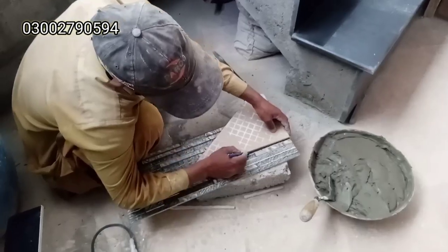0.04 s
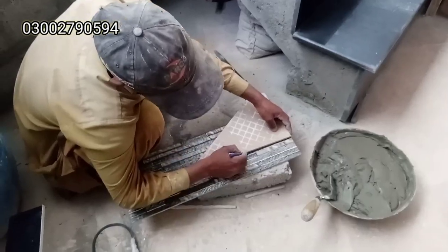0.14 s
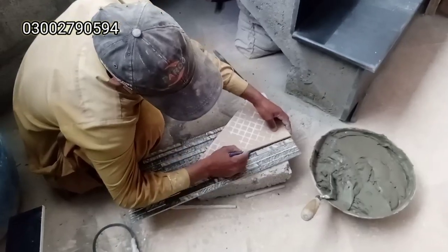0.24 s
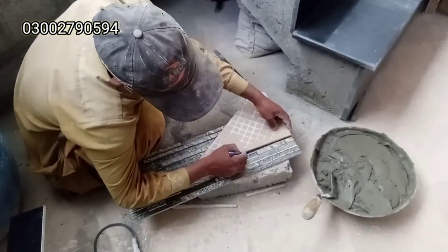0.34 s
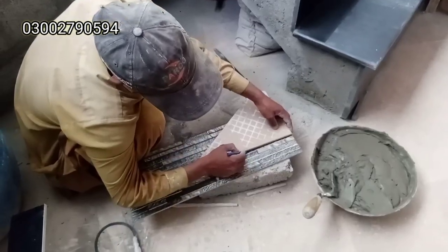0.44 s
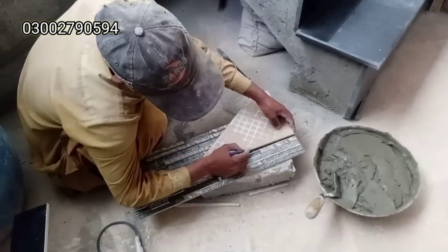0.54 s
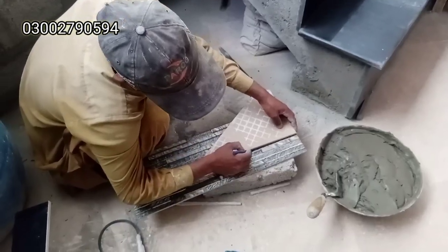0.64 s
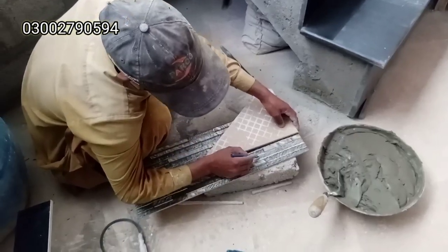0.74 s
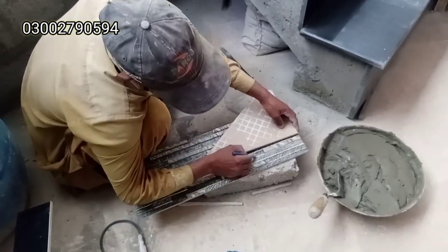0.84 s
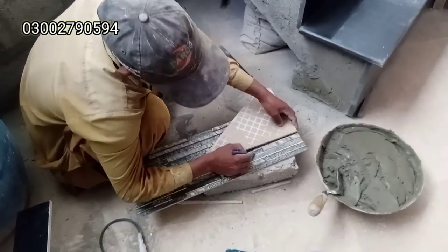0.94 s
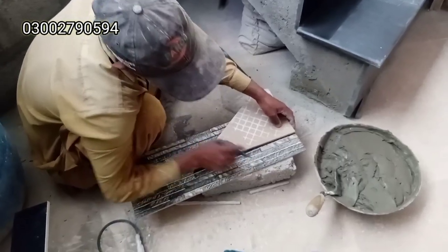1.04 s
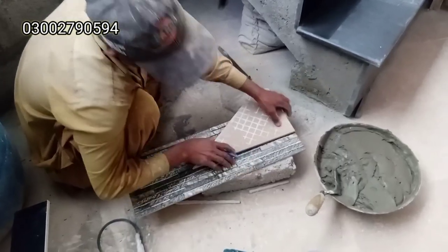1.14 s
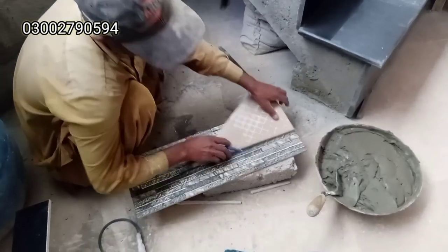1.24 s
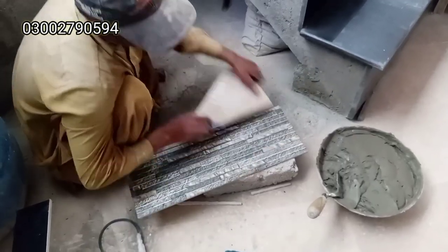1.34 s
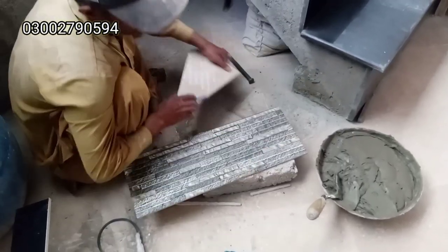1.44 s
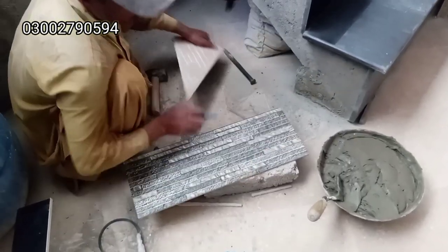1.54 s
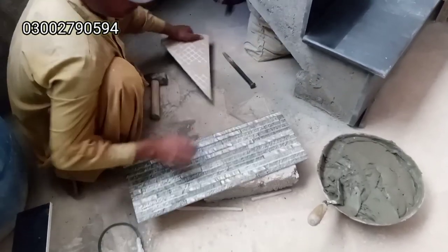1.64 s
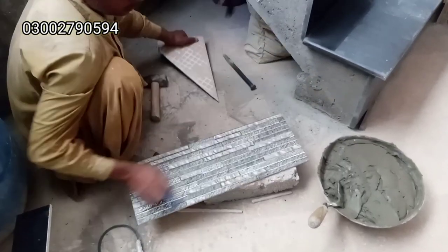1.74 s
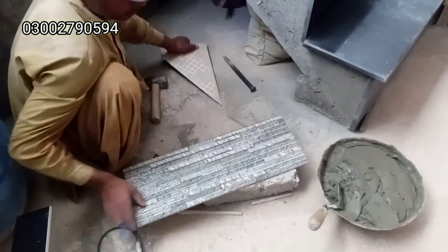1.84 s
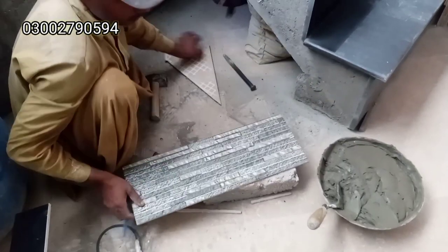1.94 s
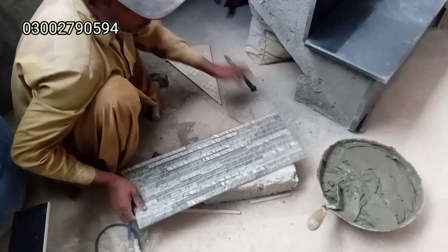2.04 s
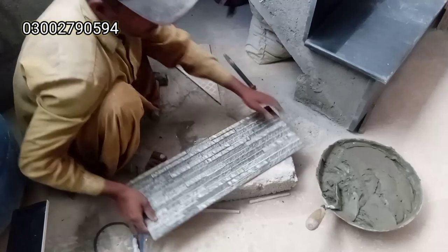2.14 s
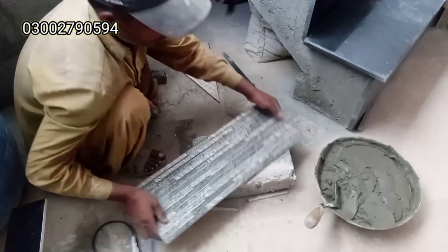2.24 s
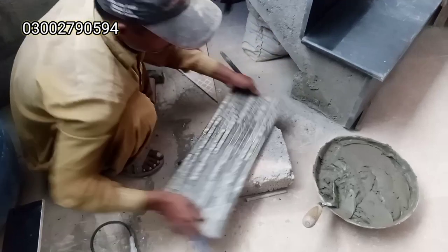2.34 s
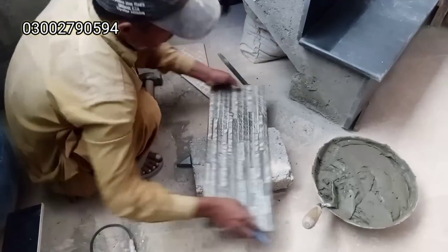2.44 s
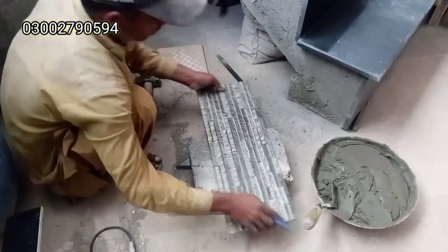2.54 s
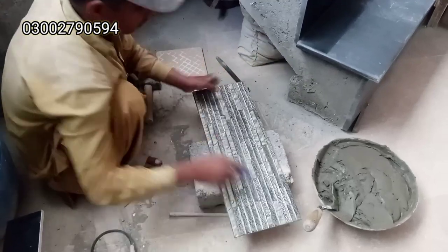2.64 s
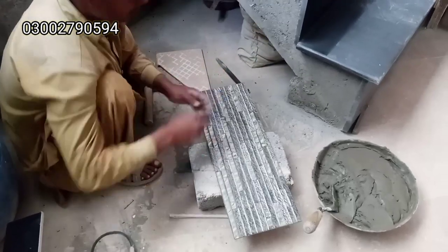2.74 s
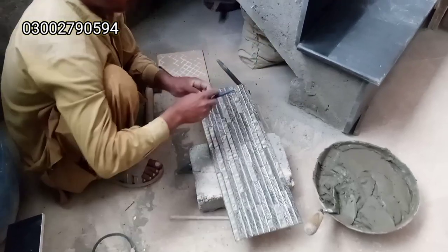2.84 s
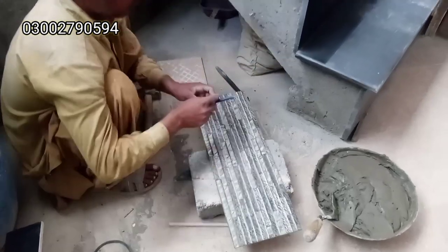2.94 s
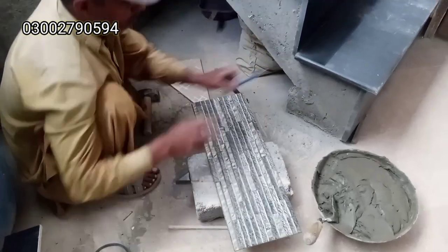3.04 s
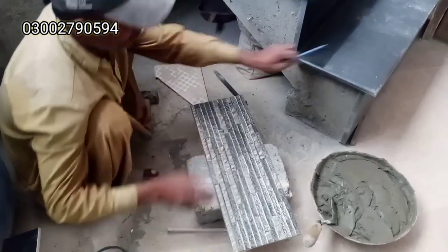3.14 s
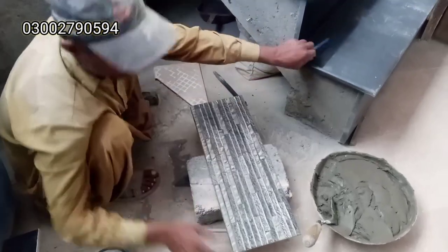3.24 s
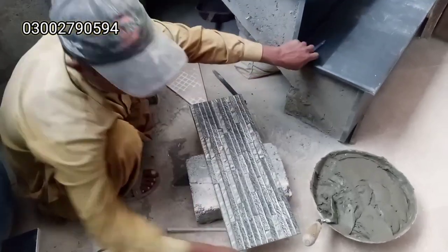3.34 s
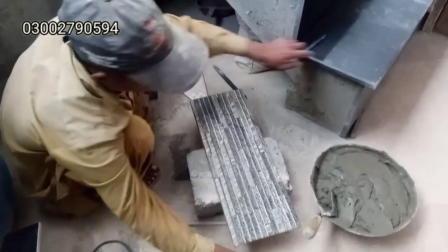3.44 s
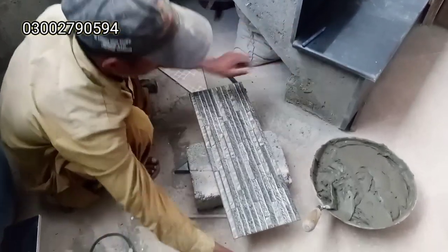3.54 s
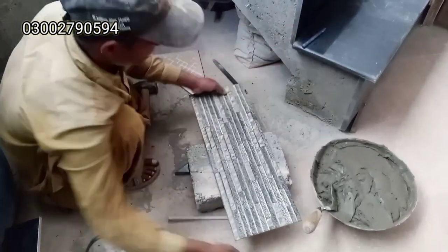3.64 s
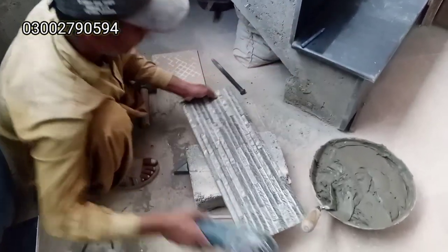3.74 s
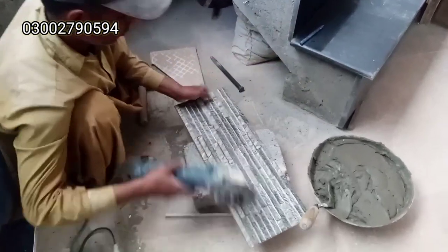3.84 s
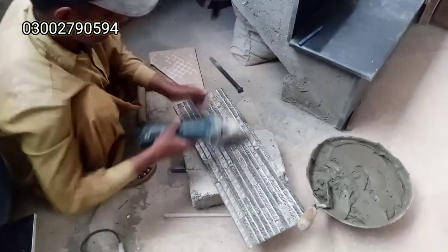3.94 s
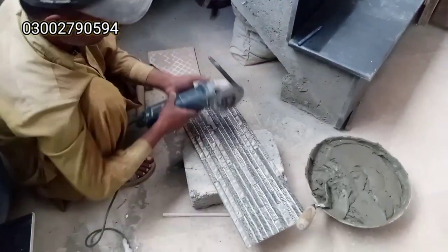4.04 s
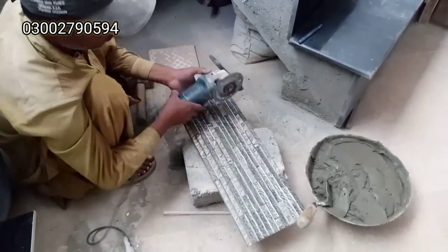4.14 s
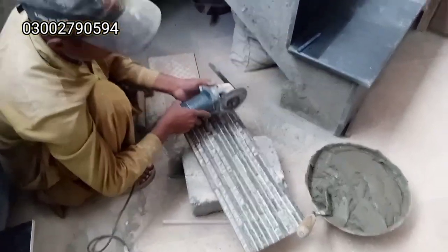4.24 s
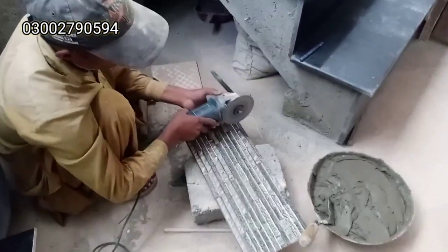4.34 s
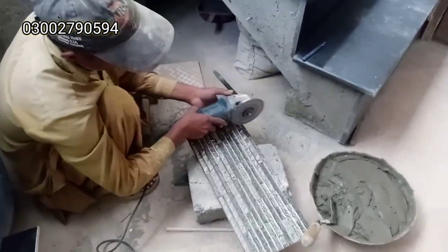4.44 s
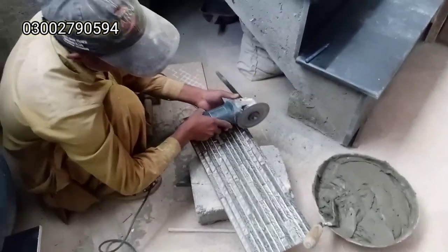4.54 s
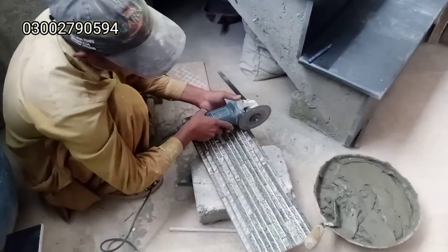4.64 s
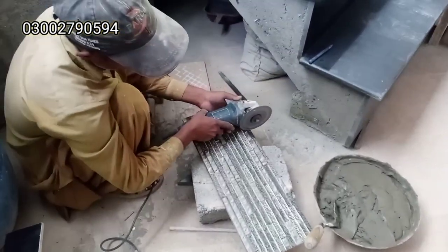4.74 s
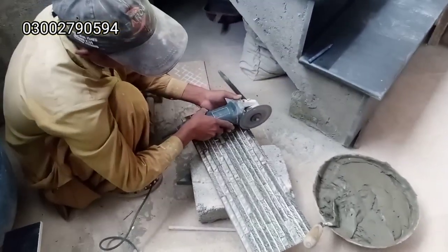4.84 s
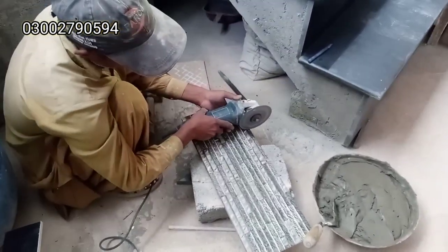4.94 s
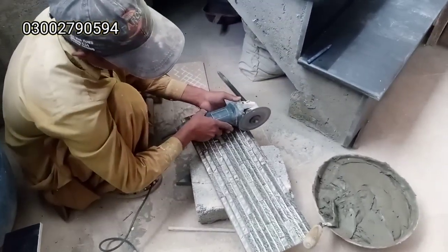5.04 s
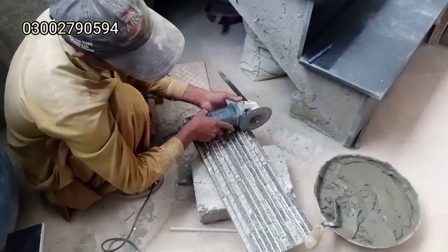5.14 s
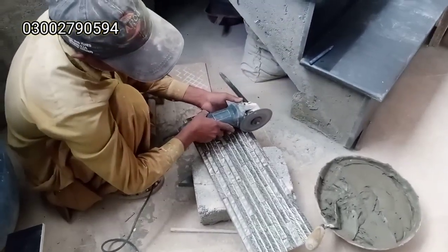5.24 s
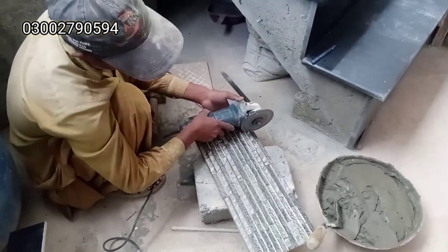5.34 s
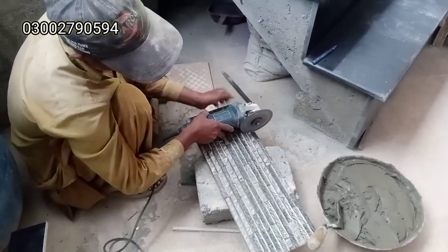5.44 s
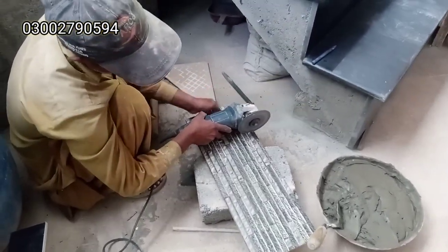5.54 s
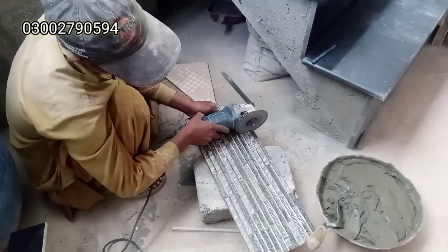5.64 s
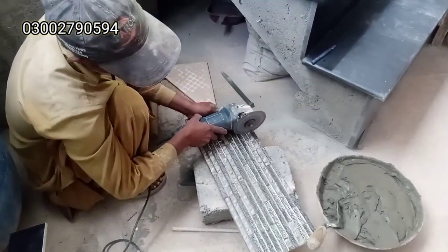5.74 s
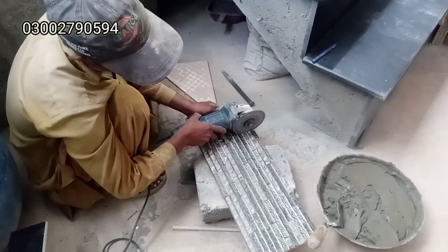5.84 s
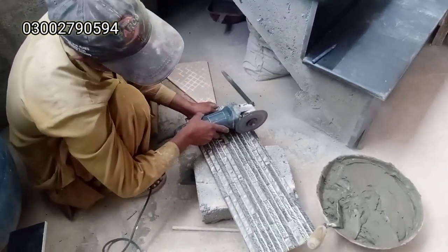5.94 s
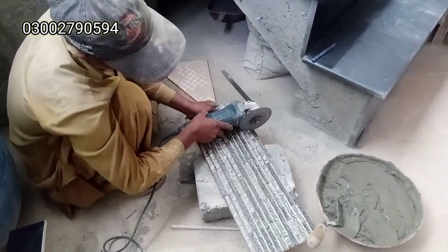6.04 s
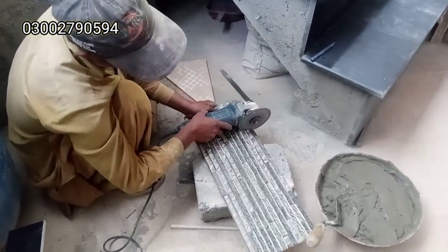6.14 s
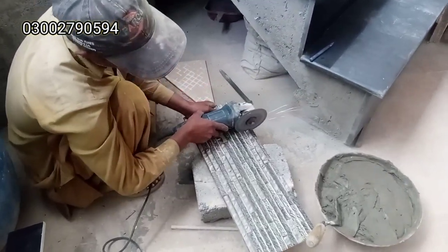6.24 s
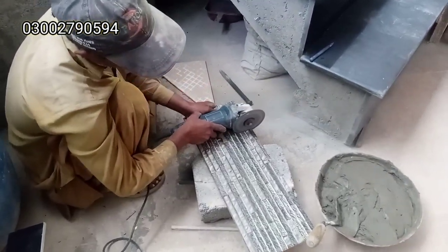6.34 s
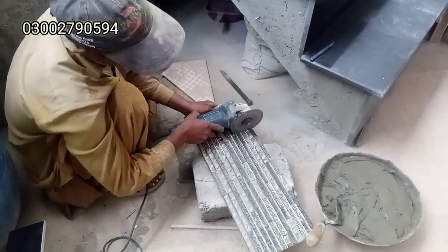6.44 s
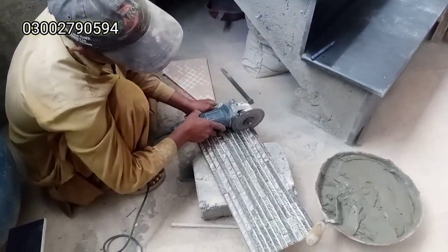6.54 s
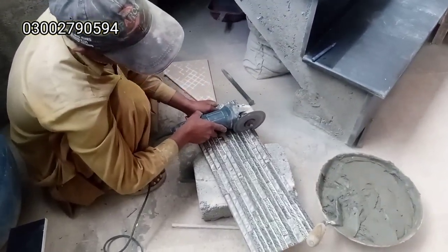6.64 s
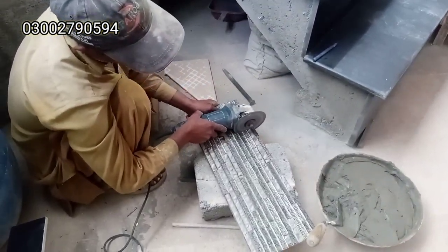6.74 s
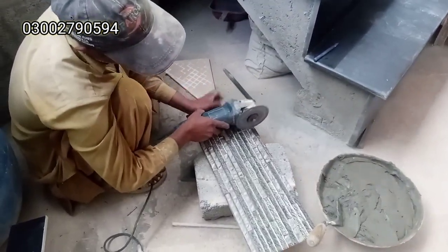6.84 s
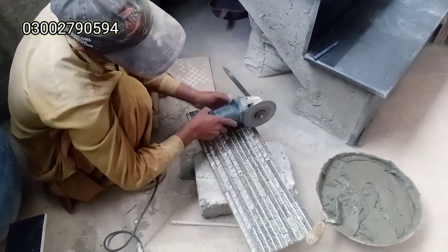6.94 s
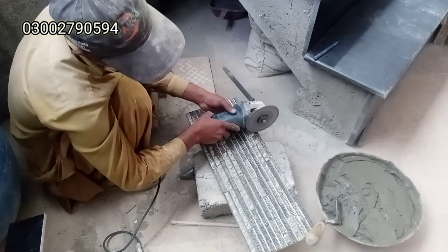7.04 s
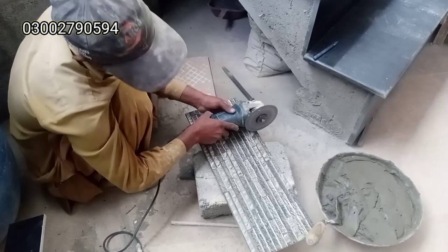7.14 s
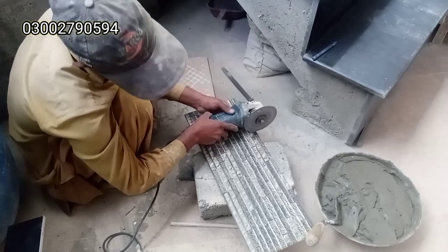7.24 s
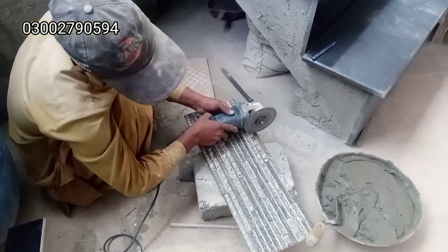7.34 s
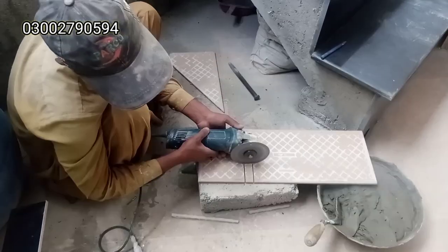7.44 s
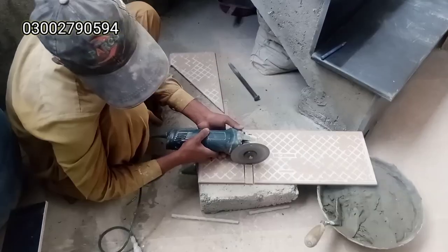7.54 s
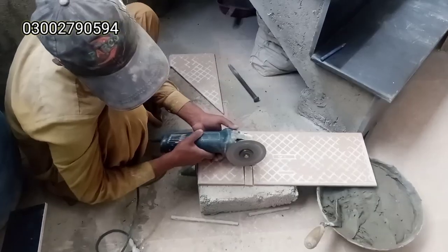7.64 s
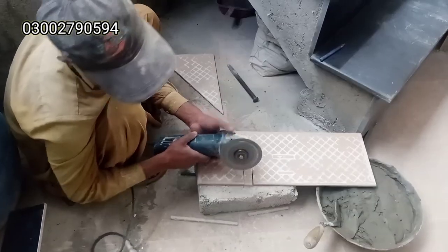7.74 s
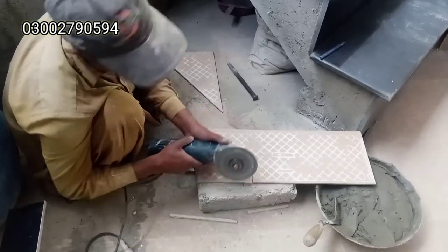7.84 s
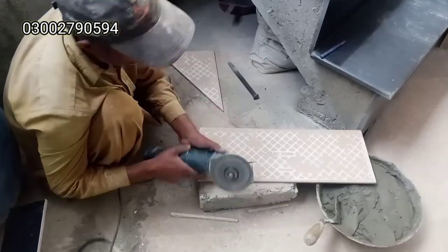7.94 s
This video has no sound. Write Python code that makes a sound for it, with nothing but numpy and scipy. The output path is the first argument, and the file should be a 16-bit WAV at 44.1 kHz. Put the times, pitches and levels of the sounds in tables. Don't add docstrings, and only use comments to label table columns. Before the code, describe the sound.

Marker rubs and stone tiles scrape and knock in a small hard room, then an angle grinder whirrs up and cuts with a ringing, bogging grind.

```python
import sys
import numpy as np
from scipy import signal
from scipy.io import wavfile
from scipy.ndimage import uniform_filter1d

SR = 44100
rng = np.random.default_rng(int(sys.argv[2]) if len(sys.argv) > 2 else 0)


def gain_from_db(level_db):
    decades = np.asarray(level_db, float) / 20
    return 10 ** decades


def dump(signal):
    limited = np.clip(np.atleast_2d(signal).T, -1, 1)
    pcm = np.round(limited * 32767).astype(np.int16)
    wavfile.write(sys.argv[1], SR, pcm)


N = 352359
T = np.arange(N) / SR

FADES_DB_PER_S = {"pair": 172, "offcut": 123, "slab": 178, "cloth": 304}
# touch in seconds, time to bite in seconds,
# time to bog the motor down in seconds, lift-out in seconds.
CUTS = [
    (5.065, .04, 1.0, 6.82),
    (7.475, .07, .02, 7.61),
]

SWITCH_S, INRUSH_S = 4.343, .095
FREE_HZ = 1015
PINION, CROWN = 11, 38


def evened(x):
    return x / np.sqrt(np.mean(x ** 2) + 1e-20)


def ramp(s, length):
    return np.clip((T - s) / max(length, 1e-3), 0, 1)


def read(points, hz):
    f, value = np.transpose(points)
    return np.interp(np.log(hz + 1), np.log(f + 1), value)


def drift(hz):
    r = np.exp(-32 * hz / SR)
    coarse = signal.lfilter([1], [1, -2 * r, r * r], rng.standard_normal(N // 32 + 2))
    return np.interp(np.arange(N) / 32, np.arange(len(coarse)), evened(coarse))


def mottled(x, streak_db):
    z = signal.stft(x, nperseg=512, noverlap=384)[2]
    streaks = uniform_filter1d(rng.standard_normal(z.shape), size=20, axis=1)
    streaks = uniform_filter1d(streaks, size=9, axis=1)
    streaked = signal.istft(z * gain_from_db(streak_db * evened(streaks)), nperseg=512, noverlap=384)[1]
    return evened(streaked[:N])


def responses(body):
    split_hz, ring_top_db = 2250, 9
    colour, rings, lift_db = body
    hz = np.abs(np.fft.fftfreq(8192, 1 / SR))
    power = gain_from_db(2 * read(colour, hz))
    for f, width, db in rings:
        power = power + gain_from_db(2 * (min(db, ring_top_db) + lift_db)) / (1 + (2 * (hz - f) / width) ** 2) ** 2
    high = 1 / (1 + (split_hz / (hz + 1)) ** 12)
    gains = np.log(np.maximum(power * [1 - high, high], 1e-10)) / 2
    taps = np.fft.ifft(np.exp(np.conj(signal.hilbert(gains)))).real[:, :4096]
    taps = taps * np.hanning(8192)[4096:]
    return taps / np.linalg.norm(taps, axis=1, keepdims=True)


def ring(body, bass, treble):
    low, high = responses(body)
    return (signal.oaconvolve(bass, low) + signal.oaconvolve(treble, high))[:len(bass)]


def follow(x, hz, width):
    turn, r = np.exp(2j * np.pi * np.cumsum(hz) / SR), np.exp(-np.pi * width / SR)
    return 2 * (turn * signal.lfilter([(1 - r) ** 2], [1, -2 * r, r * r], x / turn)).real


def orders(hz, table, waver_db):
    turns = np.cumsum(hz) / SR
    out = np.zeros(N)
    for multiple, db in table:
        out += gain_from_db(db + waver_db * drift(41)) * np.sqrt(2) * np.sin(2 * np.pi * multiple * turns)
    return out


def room_tone():
    # a colour (each point: frequency in Hz, level in dB per Hz),
    # rings (each row: frequency in Hz, width in Hz, level in dB), then the lift of the rings in dB.
    room_body = ([(15, -72), (25, -43.5), (276, -3.5), (342, -7), (812, -17), (905, -18.5), (1010, -18.5),
                  (2660, -30), (2890, -21), (4570, -16), (5520, -28), (8050, -22.5), (15800, -36)],
                  [(270, 30, -4), (3930, 60, -13), (4000, 140, -14), (8000, 26, -10.5)], 6.7)
    # middle in seconds, half length in seconds, change in dB.
    rumbles = [
        (.17, .14, 5),
        (3.4, .2, -3),
        (4.2, .15, -2),
    ]
    room_db, gated_db = -56.5, -51
    drone_hz, drone_db = 268, -11
    noise = mottled(rng.standard_normal(N), 3.5)
    gate = gain_from_db(room_db + gated_db * ramp(SWITCH_S, 0.018))
    lumps = gate * gain_from_db(1.5 * drift(25))
    swell = gain_from_db(sum(db * np.exp(-((T - s) / half) ** 2) for s, half, db in rumbles))
    drone = gate * orders(drone_hz + 3 * drift(20), [(1, drone_db)], 2.0)
    return ring(room_body, noise * lumps * swell, noise * lumps * gain_from_db(-7.5)) + drone


def walls(x):
    # frequency in Hz, time to die away by 60 dB in seconds.
    dying = [(600, 0.27), (11000, 0.29)]
    taps = np.zeros(SR // 2)
    at = np.arange(200, SR // 2 - 20, 20)
    taps[at + rng.integers(0, 20, len(at))] = rng.choice([-1., 1.], len(at))
    hz, t, z = signal.stft(taps, SR, nperseg=256)
    tail = signal.istft(z * gain_from_db(-60 * t / read(dying, hz)[:, None]), SR, nperseg=256)[1]
    return signal.fftconvolve(x, tail / np.linalg.norm(tail))[:N]


def grit(per_s, spread_db):
    grains = gain_from_db(spread_db * np.minimum(rng.exponential(1, N), 4)) * (rng.random(N) < per_s / SR)
    return evened(evened(grains * rng.standard_normal(N)) + 1.3 * rng.standard_normal(N))


def marking(force):
    # start in seconds, peak in dB, change of the treble in dB (below 0 duller, above 0 brighter),
    # length in seconds.
    marks = [(0.079, -27.5, -11, 0.079), (0.186, -33.5, -26, 0.14), (0.364, -40.5, 0, 0.08),
             (0.499, -35.5, -4, 0.053), (0.645, -34.5, -2, 0.071), (0.876, -36.5, -21, 0.052),
             (1.015, -32, -8, 0.063), (1.114, -43.5, -2, 0.2), (3.136, -37, -9, 0.2),
             (3.322, -49, 9, 0.048), (3.362, -48.5, 19.5, 0.057), (3.456, -53, 17.5, 0.27),
             (3.603, -40, -1, 0.03), (4.04, -49, 14, 0.14), (4.193, -51.5, 22, 0.1)]
    # frequency in Hz, level in dB per Hz.
    marker_colour = [(350, -19), (600, -14.5), (1610, -19), (2490, -44), (2980, -9), (8530, -12),
                     (12200, -5), (15800, -14.5)]
    # frequency in Hz, width in Hz, level in dB.
    marker_rings = [(3510, 45, -1), (5350, 96, 0), (12000, 26, -10), (12500, 46, 4)]
    bright, dull = np.zeros((2, N))
    for s, db, dull_db, length in marks:
        u = np.maximum(T - s, 0)
        swell = gain_from_db(db - 18.0) * (1 - np.exp(-u / 0.01)) * np.exp(-(u / length) ** 2)
        bright = bright + swell * gain_from_db(dull_db)
        dull = dull + swell * (1 - gain_from_db(dull_db))
    push = force * bright + signal.lfilter([.45], [1, -.55], force * dull)
    marker, cloth = push * (T < 2), push * (T > 2)
    rung = ring((marker_colour, marker_rings, 2.0), 0.51 * marker, marker)
    return rung + ring((marker_colour, (), 0), 0.13 * cloth, cloth)


def effort(row, strokes, fade_db_per_s):
    tail_s = .22
    linger = .045
    start, let_go, entry_db, top_db, weight_db = row
    end = min([let_go + tail_s] + [other[0] for other in strokes if other[0] > start])
    faded_db = fade_db_per_s * np.maximum(T - let_go, 0)
    level_db = entry_db + (top_db - entry_db) * ramp(start, let_go - start) ** .65 - faded_db
    treble = ramp(start, .003) * (1 - ramp(end - .003, .003)) * gain_from_db(level_db)
    return treble * gain_from_db(weight_db + linger * faded_db), treble, end


def scrape(force, knocks, colour, fade_db_per_s, row, strokes, rings=()):
    ring_lift_db = 9
    damping = 1.5
    bass, treble, end = effort(row, strokes, fade_db_per_s)
    push = force * (1 + knocks / (treble + 1e-4))
    span = slice(round(row[0] * SR), round((end + .1) * SR))
    held = (colour, [(f, width * damping, db) for f, width, db in rings], ring_lift_db)
    out = np.zeros(N)
    out[span] = ring(held, (push * bass)[span], (push * treble)[span])
    return out


def cloth_swish(force):
    # start in seconds, let-go in seconds, entry in dB, let-go level in dB,
    # weight (bass minus treble) in dB.
    swish = [
        (2.931, 2.96, -47, -33.5, -16),
    ]
    # frequency in Hz, level in dB per Hz.
    cloth_colour = [(120, -42), (200, -26), (547, -1), (1670, 0), (2040, -10), (2190, -14), (12000, -10),
                    (15800, -19)]
    return scrape(force, 0, cloth_colour, FADES_DB_PER_S["cloth"], swish[0], swish)


def knocking():
    # time in seconds, peak in dB.
    blows = [(1.23, -18), (1.255, -32), (1.324, -14), (1.758, -11), (1.765, -24), (1.833, -22),
             (1.866, -22), (1.883, -21), (1.903, -26), (1.995, -9), (2.011, -15), (2.151, -23),
             (2.198, -36), (2.216, -33), (2.34, -25), (2.46, -18.5), (2.486, -19), (2.507, -27),
             (2.527, -29), (2.564, -26), (2.652, -22), (3.725, -30), (3.748, -30), (3.783, -18),
             (3.807, -34), (3.826, -22), (3.839, -21), (3.861, -24)]
    return sum(gain_from_db(db - 13) * (T > s) * np.exp(-np.abs(T - s) / .006) for s, db in blows)


def stones(force):
    # start in seconds, let-go in seconds, entry in dB, let-go level in dB,
    # weight (bass minus treble) in dB.
    lifts = [(1.225, 1.243, -31, -30, -16), (1.287, 1.312, -45, -33.5, 2.5), (1.321, 1.336, -23, -25, -12),
             (1.507, 1.527, -44, -47.5, -16)]
    offcuts = [(1.758, 1.865, -31, -32, -13), (1.874, 1.906, -28, -27, -20.5),
               (1.991, 2.07, -27.5, -30, -30.5)]
    slides = [(2.082, 2.219, -46, -28.5, -1.5), (2.262, 2.279, -37, -34.5, -0.5),
              (2.328, 2.343, -42, -32.5, -0.5), (2.461, 2.54, -34.5, -34.5, 2.5),
              (2.552, 2.646, -33, -32, -2), (3.717, 3.763, -44.5, -35, 1.5),
              (3.776, 3.852, -32, -28.5, -0.5), (3.605, 3.615, -55, -55, 1)]
    # frequency in Hz, level in dB per Hz.
    pair_colour = [(120, -64), (200, -75), (499, -5), (848, -16.5), (1360, -7), (2080, -14), (4480, -3.5),
                   (4900, -8), (11400, -19), (15800, -25)]
    offcut_colour = [(120, -52), (200, -42), (1270, -29), (1520, -11), (2890, -15), (3940, -4.5),
                     (7890, -8.5), (9300, -10.5), (12700, -10), (15800, -25)]
    slab_colour = [(120, -39), (200, -22.5), (499, -2), (981, -6.5), (1220, 4), (2590, -20.5), (3160, -9.5),
                   (9130, -16.5), (11400, -13), (15800, -18.5)]
    # frequency in Hz, width in Hz, level in dB.
    lift_rings = ([
        [(3740, 60, 3), (5650, 55, -13), (9880, 32, -23), (12500, 32, -21), (13200, 29, -24)],
        [(1400, 220, -3), (3030, 110, -4)],
        [(3970, 70, -5), (4450, 130, -4), (5280, 60, -6), (7130, 42, -7), (8730, 190, -8), (11100, 140, -8), (13200, 42, -11)],
        [(2310, 29, -5), (3730, 44, -2), (9850, 39, 0), (12200, 29, -3)],
    ])
    offcut_rings = ([
        [(1560, 64, -11), (2330, 37, -6), (4500, 31, 5), (5540, 36, -4), (8080, 30, -6), (8840, 130, -18), (11200, 48, -19), (12400, 39, -16), (13200, 190, -18), (15300, 53, -23)],
        [(1590, 51, -16), (3885, 88, -5), (4540, 59, -8), (6200, 100, -2), (7400, 36, -6), (8020, 58, -5), (9960, 58, -3), (10550, 42, -1), (12400, 39, -3), (13300, 36, -5), (14400, 56, -14), (15300, 36, -12)],
        [(2365, 27, -11), (3895, 94, 1), (4420, 50, -5), (7150, 100, 4.5), (7700, 68, 3), (9000, 110, -15), (9790, 49, -6), (11100, 57, -1), (12200, 83, -10)],
    ])
    slide_rings = ([
        [(1362, 37, 2), (2250, 42, -7), (4290, 140, -9), (7110, 42, -7), (7600, 31, -11), (10000, 63, -8), (11600, 39, -6), (12300, 46, -3), (13800, 34, -10), (14400, 33, -13), (15200, 32, -15)],
        [(1095, 35, 5), (2850, 37, -12), (4090, 47, -7), (11000, 38, -14), (12700, 30, -8), (13800, 33, -15), (15100, 41, -11)],
        [(1230, 37, 6), (1710, 30, 0.5), (2210, 36, -4), (3340, 33, -11), (11600, 47, -13), (13200, 37, -11)],
        [(1245, 42, 6), (2210, 77, -11), (3700, 38, -10), (4900, 29, -19), (6550, 80, -12), (7930, 59, -14), (8590, 53, -18), (10100, 41, -22), (11600, 130, -20), (13000, 32, -16), (14000, 39, -21)] + [(1365, 40, 0)],
        [(1257, 27, -1.5), (2210, 71, -10.5), (3784, 35, -8.5), (4690, 40, -10), (8580, 60, -17), (9900, 80, -17), (10900, 37, -14), (11600, 130, -15), (13200, 49, -11), (14500, 57, -19), (15100, 33, -21)],
        [(1290, 33, 0.5), (3540, 34, -8), (5850, 76, -16), (7330, 47, -14), (9990, 52, -20), (11500, 54, -16), (12600, 37, -14), (15000, 32, -17)],
        [(1362, 49, 1.5), (2227, 78, -10.5), (3050, 35, -8), (4950, 28, -9), (5800, 35, -6), (7040, 36, -17), (8560, 150, -21), (11100, 52, -14), (11670, 46, -13), (13100, 66, -17), (15000, 40, -19)] + [(1230, 50, -1), (5300, 40, -12)],
        [(807, 45, 12)],
    ])
    knocks = knocking()
    out = np.zeros(N)
    for name, colour, strokes, rings in (("pair", pair_colour, lifts, lift_rings),
                                         ("offcut", offcut_colour, offcuts, offcut_rings),
                                         ("slab", slab_colour, slides, slide_rings)):
        for row, row_rings in zip(strokes, rings):
            out += scrape(force, knocks, colour, FADES_DB_PER_S[name], row, strokes, row_rings)
    return out


def motion():
    quick_hz, quick_s, slow_hz, slow_s = 436, .066, 409, .27
    sag_hz, recover_s = 112, .19
    leave_s, sink_s = 0.072, 0.43
    u = np.maximum(T - SWITCH_S, 0)
    load, contact = np.zeros((2, N))
    for s, bite, bog, lift in CUTS:
        load += ramp(s + bite, bog) * np.exp(-np.maximum(T - lift, 0) / recover_s)
        contact += ramp(s, bite) * (1 - ramp(lift, leave_s))
    speed_hz = FREE_HZ - quick_hz * np.exp(-u / quick_s) - slow_hz * np.exp(-u / slow_s)
    speed_hz = speed_hz - sag_hz * np.minimum(load, 1)
    return speed_hz, contact, ramp(CUTS[0][0], sink_s)


def loudness(speed_hz, contact, sunk):
    free_db, inrush_db, cut_db, sink_db, weight_db = -23.5, -24.5, 2.5, 1.5, -16
    click_db, click_s = 11, .018
    dip_s, dip_db, dip_in_s, dip_out_s = 7.485, -10, 0.048, 0.13
    inrush = 1 - ramp(SWITCH_S + INRUSH_S - .005, .015)
    dip = ramp(dip_s - dip_in_s, dip_in_s) - ramp(dip_s, dip_out_s)
    running = gain_from_db(free_db + contact * (cut_db + sink_db * sunk) + dip_db * dip)
    running = running * (speed_hz / FREE_HZ) ** .15
    treble = ramp(SWITCH_S, .003) * (inrush * gain_from_db(inrush_db) + (1 - inrush) * running)
    thump_db = click_db * np.exp(-np.abs(T - SWITCH_S) / click_s)
    return treble * gain_from_db(weight_db + thump_db), treble, inrush


def fan_whirr(air, bass, treble, cut):
    whirr_body = ([(35, -83), (60, -64), (124, -46), (280, -25), (397, -28.5), (489, -23.5), (877, -17),
                   (962, -13.5), (1190, -15.5), (3900, 2), (7670, -2), (10900, 2.5), (15800, -1)],
                   [(3100, 160, -3), (3980, 810, -2.5)], 0.5)
    lag_db, lag_s, lag_hz = -13, .12, 4200
    free = np.sqrt(1 - cut)
    whirr = ring(whirr_body, air * bass * free, air * treble * free)
    whirr = signal.sosfilt(signal.butter(4, 150, "high", fs=SR, output="sos"), whirr)
    lag = gain_from_db(lag_db * ramp(SWITCH_S + 0.0091, .02) * np.exp(-np.abs(T - SWITCH_S) / lag_s))
    draught = signal.sosfiltfilt(signal.butter(3, lag_hz, fs=SR, output="sos"), whirr)
    return whirr - (1 - lag) * draught


def gear_howl(air, speed_hz, treble, inrush, contact):
    inrush_db, running_db, cut_db = 2, -8, -5
    mesh_hz = PINION * speed_hz * (1 + 0.03 * drift(320))
    howl = evened(follow(air[::-1], mesh_hz, 1500))
    howl = howl + .25 * evened(follow(air[::-1], 2 * mesh_hz, 2500))
    howl = signal.sosfilt(signal.butter(3, 2500, "high", fs=SR, output="sos"), howl)
    howl_db = running_db + (inrush_db - running_db) * inrush + cut_db * contact
    return howl * treble * gain_from_db(howl_db) * ramp(SWITCH_S, .028)


def motor_whine(speed_hz, contact):
    # multiple of the motor speed, level in dB.
    armature_orders = [(1, -1), (2, 1), (3, 1), (4, -3), (5, -14)]
    full_db, full_hz, steep_db, cut_db = -46.5, 890, 120, -13
    whine_db = full_db - steep_db * np.abs(np.log10(speed_hz / full_hz)) + cut_db * contact
    whine = gain_from_db(whine_db) * orders(speed_hz * (1 + .0012 * drift(100)), armature_orders, 3.5)
    return whine * ramp(SWITCH_S + INRUSH_S, .1)


def disc_cutting(stone, disc_hz, bass, treble, cut, sunk):
    # a colour (each point: frequency in Hz, level in dB per Hz), rings (each row: frequency
    # in Hz, width in Hz, level in dB), then the lift of the rings in dB.
    rim_body = ([(35, -58), (60, -30.5), (727, -12), (1030, -13), (1400, -2.5), (2560, -47), (2810, -14),
                 (3020, -2.5), (7150, -15), (12200, -4.5), (15800, -16)], [(4820, 130, -8),
                 (6400, 68, -0.5), (8570, 50, 1), (9800, 29, -6), (10580, 50, 2), (11000, 56, 7.5),
                 (11500, 80, 2), (11900, 63, 4), (12300, 32, -8), (12600, 38, -2), (15000, 26, 6)], 8.1)
    buried_body = ([(35, -72), (60, -39.5), (525, -20.5), (985, -18), (1300, -14.5), (1460, -23),
                    (3720, -9.5), (4700, -2.5), (5800, -10.5), (6990, -10.5), (10900, -15), (12800, -5.5),
                    (14400, 1.5), (15800, -15.5)], [(3520, 31, -6), (4840, 110, 1.5), (5220, 300, -4),
                    (6533, 52, -1), (8130, 320, -10.5), (9160, 32, -34), (10900, 90, -4), (11430, 50, -2),
                    (12300, 50, -16), (12600, 180, -27), (14000, 50, -9), (14000, 80, -1)], 5.1)
    depth = np.clip(.93 * sunk, 0, 1)
    wobble = 1 + 0.25 * np.sin(2 * np.pi * np.cumsum(disc_hz) / SR)
    bite = wobble * gain_from_db(1.0 * drift(71)) * np.sqrt(cut)
    shallow = stone[::-1] * bite * np.sqrt(1 - depth)
    deep = stone * bite * np.sqrt(depth)
    return ring(rim_body, shallow * bass, shallow * treble) + ring(buried_body, deep * bass, deep * treble)


def disc_hum(disc_hz, contact, sunk):
    # multiple of the disc speed, level in dB.
    disc_orders = [(3, -19), (4, -16), (4.6, -14), (5, 1), (7, -18), (8, -12)]
    # middle in seconds, level in dB.
    shudders = [
        (6.07, -45),
        (6.76, -38),
        (7.59, -48),
    ]
    hum_db, tile_hz, tile_width_hz, tile_db = -55, 1388, 46, 26
    squeal_hz, squeal_db, choke_db = 2860, -37, -20
    tile = np.exp(-((5 * disc_hz - tile_hz) / tile_width_hz) ** 2)
    swell = gain_from_db(hum_db + tile_db * tile) * contact * sunk * (T < CUTS[1][0])
    swell = swell + sum(gain_from_db(db) * np.exp(-((T - s) / .055) ** 2) for s, db in shudders)
    hum = swell * orders(disc_hz * (1 + .0015 * drift(120)), disc_orders, 3.0)
    squeal = gain_from_db(squeal_db + choke_db * sunk ** 9) * contact
    return hum + squeal * orders(squeal_hz + 10 * drift(60), [(1, 0)], 3.0)


def disc_singing():
    # middle in seconds, length in seconds, frequency in Hz, level in dB.
    songs = [(5.44, .3, 4830, -29.5), (5.66, 0.11, 4840, -30), (5.9, 0.34, 5300, -33),
             (6.07, .14, 4820, -26), (6.34, .24, 4850, -24.5), (6.55, .2, 5500, -38), (6.78, .3, 4800, -30),
             (7.62, .16, 4750, -33), (5, .5, 4800, -36), (6.02, 0.33, 5250, -33), (6.08, .2, 5450, -31),
             (6.7, .3, 5230, -36), (6.72, .36, 5450, -36), (5.66, .2, 2280, -42), (5.3, .3, 4300, -41),
             (7.63, 0.12, 5270, -28), (5.42, .2, 3510, -41), (5.8, 0.1213, 3500, -38),
             (6.63, .2, 3420, -43), (6.1, .2, 4230, -39), (6.28, 0.14, 6200, -39), (7.9, 0.14, 6550, -35),
             (5.2, 0.28, 14100, -36), (5.5, .1, 14100, -31), (6.2, .2, 13000, -27), (6.45, .4, 15000, -35),
             (6.5, 0.48, 16000, -33), (6.42, 0.306, 14800, -34), (6.25, 0.22, 10980, -36),
             (5.92, .26, 1150, -41)]
    wander_hz, waver_db = 30, 2
    out, wander, waver = np.zeros(N), drift(308), drift(100)
    for k, (s, length, hz, db) in enumerate(songs):
        at, size = round((s - length / 2) * SR), round(length * SR)
        part = slice(k * 9000, k * 9000 + size)
        turns = np.cumsum(hz + wander_hz * wander[part]) / SR
        level = gain_from_db(db + 3 + waver_db * waver[part]) * np.hanning(size) ** .7
        out[at:at + size] += level * np.sin(2 * np.pi * turns)
    return out


def grinder():
    shallow_share, deep_share = 0.65, 0.8
    speed_hz, contact, sunk = motion()
    cut = np.clip(contact * (shallow_share + (deep_share - shallow_share) * sunk), 0, 1)
    disc_hz = speed_hz * PINION / CROWN
    bass, treble, inrush = loudness(speed_hz, contact, sunk)
    air = mottled(rng.standard_normal(N), 2.0)
    stone = mottled(rng.standard_normal(N), 3.0)
    machine = fan_whirr(air, bass, treble, cut) + gear_howl(air, speed_hz, treble, inrush, contact)
    machine = machine + motor_whine(speed_hz, contact)
    disc = disc_cutting(stone, disc_hz, bass, treble, cut, sunk) + disc_hum(disc_hz, contact, sunk)
    return machine + disc + disc_singing()


def scene():
    force = mottled(grit(3000, 2.5), 3.8) * gain_from_db(1.2 * drift(400))
    near = marking(force) + cloth_swish(force) + stones(force) + grinder()
    return np.tile(near + gain_from_db(-8) * walls(near) + room_tone(), (2, 1))


def roll_off(x):
    return signal.sosfilt(signal.butter(12, 16340, fs=SR, output="sos"), x)


def record(dry):
    # middle in seconds, low edge in Hz, high edge in Hz.
    spreads = [(4.81, 9000, 10500), (4.995, 13000, 14800), (5.53, 12400, 14000), (6.34, 9700, 12000),
               (6.53, 12400, 14000), (7.39, 12400, 14000), (7.62, 8300, 13300), (7.81, 6900, 14000)]
    out = dry - .5 * np.sign(dry) * np.maximum(np.abs(dry) - .28, 0)
    for s, low_hz, high_hz in spreads:
        span = slice(round(s * SR) - 1024, round(s * SR) + 1024)
        band_filter = signal.butter(6, [low_hz, high_hz], "band", fs=SR, output="sos")
        band = signal.sosfilt(band_filter, out[0, span][::-1])
        out[:, span] += gain_from_db(-2) * band * np.hanning(2048) * [[1], [-1]]
    top_cut = signal.firwin(801, 15720, window=("kaiser", 9), fs=SR)
    out = signal.oaconvolve(out, top_cut[None], "same")
    return roll_off(out)


dry = scene()
out = record(dry)
dump(out)
```